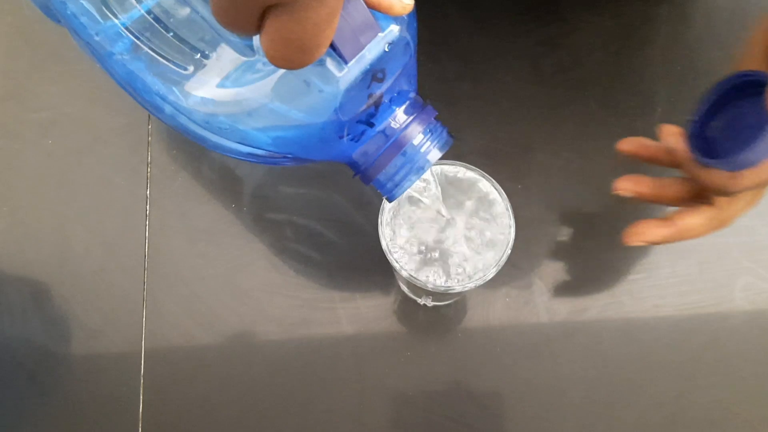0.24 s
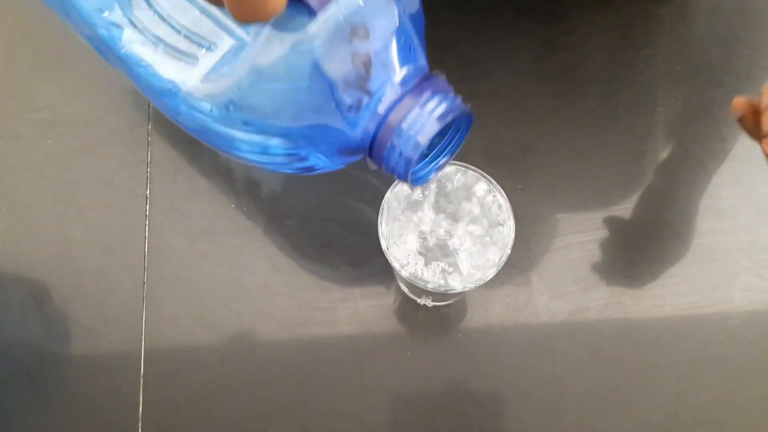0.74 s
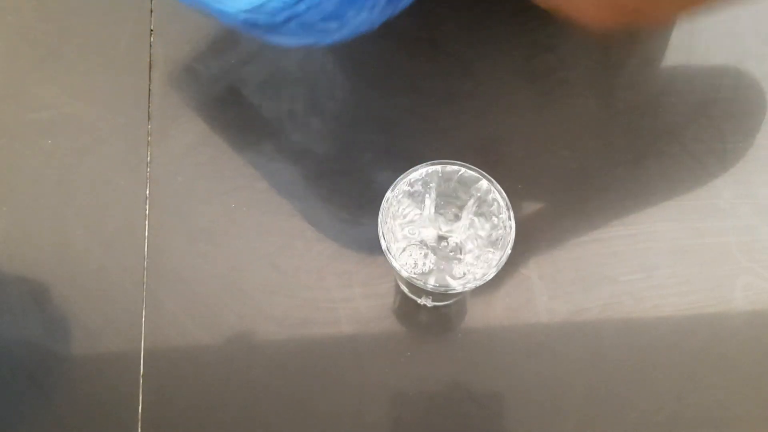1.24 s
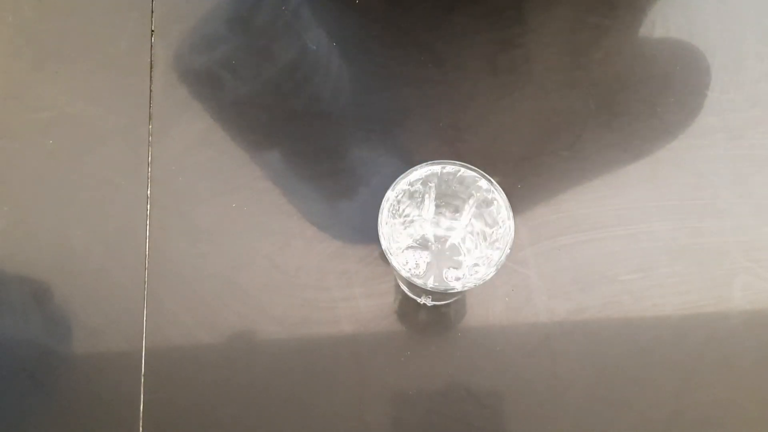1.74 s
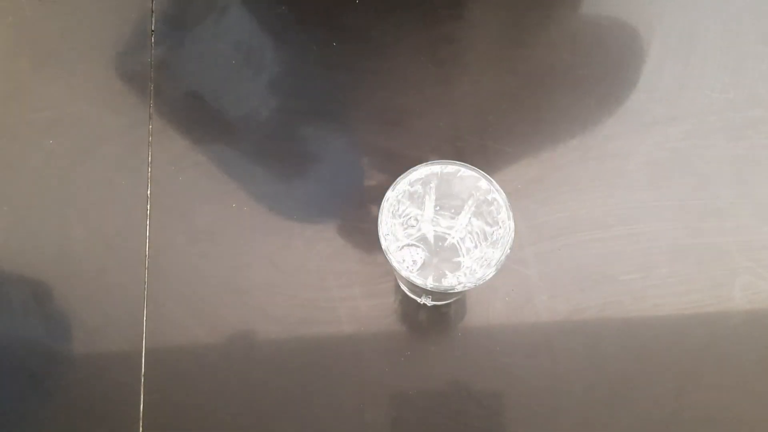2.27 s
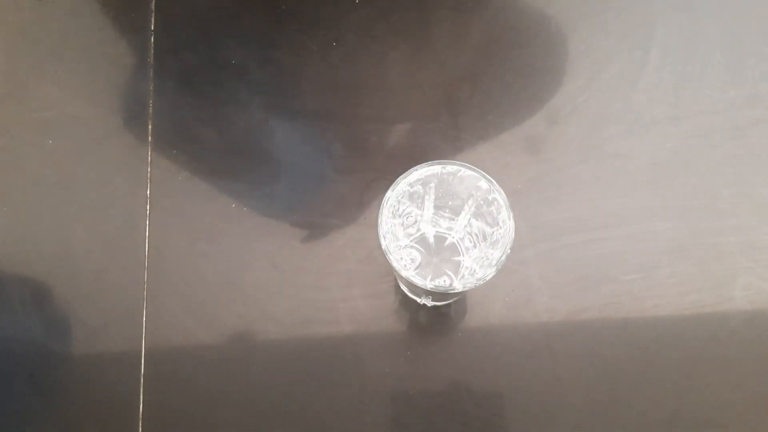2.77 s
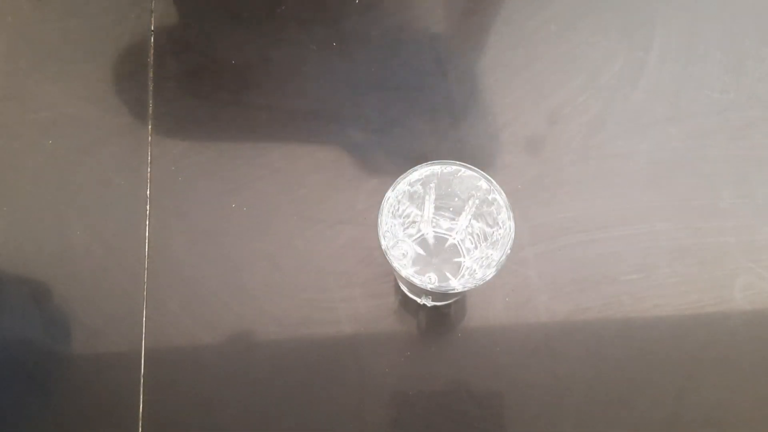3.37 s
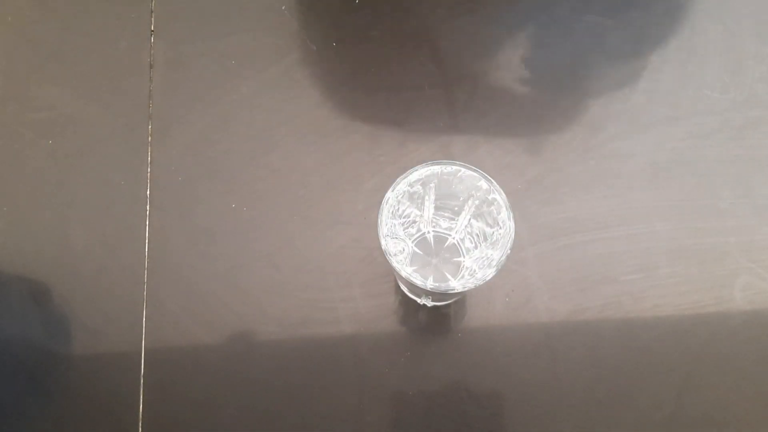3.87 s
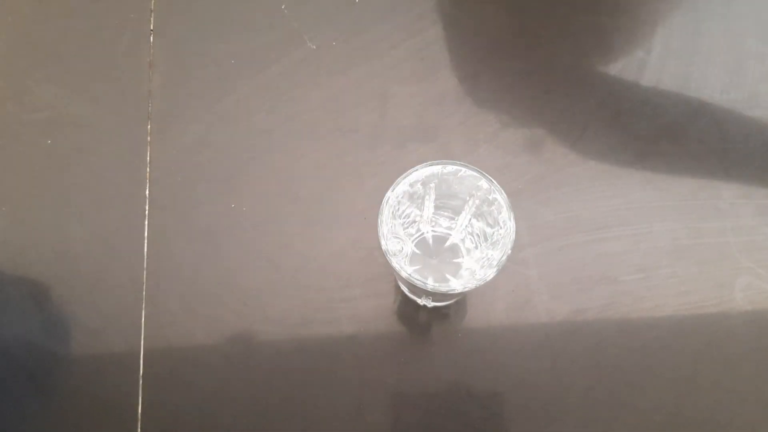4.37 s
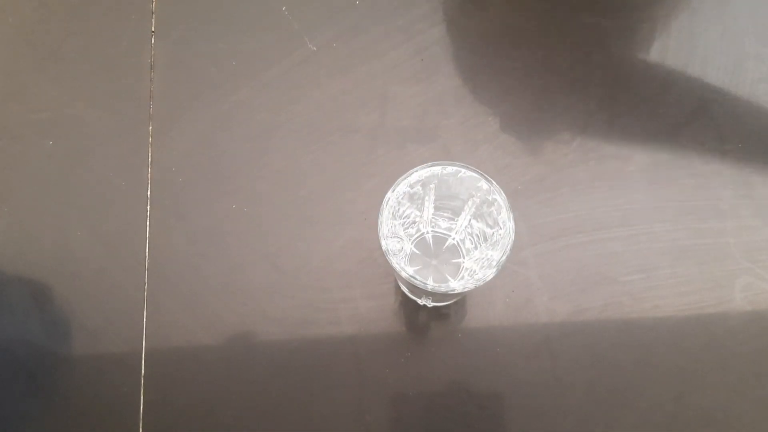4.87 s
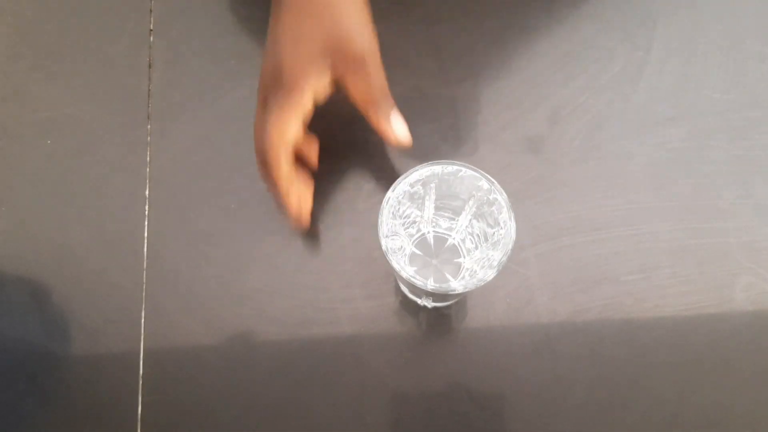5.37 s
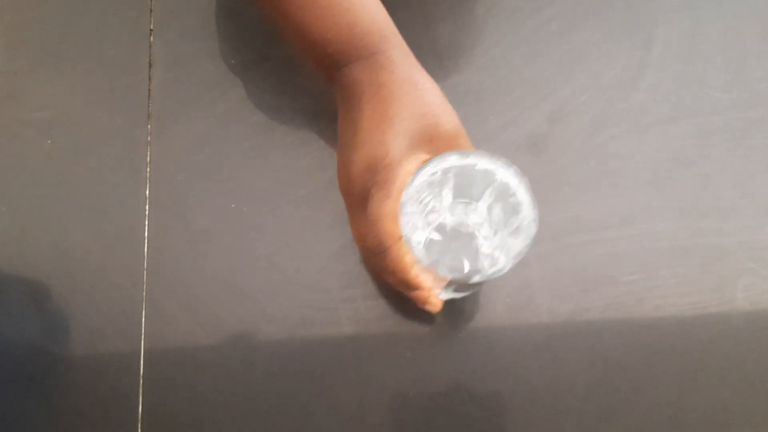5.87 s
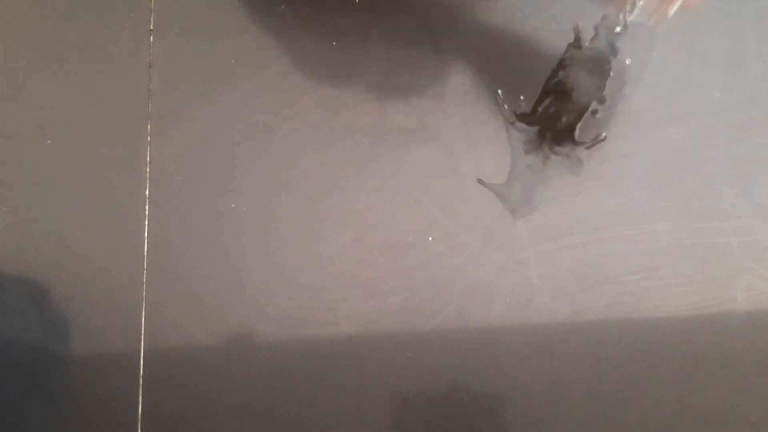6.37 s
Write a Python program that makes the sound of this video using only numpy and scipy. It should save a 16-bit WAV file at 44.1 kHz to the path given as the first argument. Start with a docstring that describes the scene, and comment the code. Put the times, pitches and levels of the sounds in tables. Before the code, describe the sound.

In a hard, echoing room, the end of a pour glugs softly into a tumbler and settles into tiny bubbling. A large thin-walled plastic bottle is lifted away, crackling and popping in irregular bursts, then set down with two loud, boomy thumps close together. A few small crinkles follow, then a hand slides the glass off the table with a low judder. Faint room air and a steady hum lie beneath; stereo pickup.

```python
"""The last of a pour gurgles from a big plastic water bottle into a tumbler in a hard, echoing room.
The bottle is lifted away, its thin walls buckling and crackling, and is set down with two heavy thumps.
A hand then slides the glass off the table, over a faint steady hum. Filtered noise renders flow and friction,
decaying sinusoids the resonances, and click clusters the impacts, each answered by a decaying room tail."""
import sys
import numpy as np
from scipy import signal
from scipy.fft import rfft, irfft
from scipy.io import wavfile

SR = 44100
rng = np.random.default_rng(int(sys.argv[2]) if len(sys.argv) > 2 else 0)


def unload_wav(signal):
    """Save mono or channel-first audio to the path in sys.argv[1] as 16-bit WAV at rate SR, clipped to [-1, 1]."""
    wavfile.write(
        sys.argv[1],
        SR,
        np.round(np.clip(np.atleast_2d(signal).T, -1, 1) * 32767).astype(np.int16),
    )


N = 291930
TIME = np.arange(N) / SR
T = TIME[:SR]  # one second, the life of a single sound

# quiet room air, noise spectrum: f/Hz, level/dB per Hz
AIR_SPECTRUM = [(40, -28.5), (110, -12), (220, -25), (320, -7), (450, -17.5), (570, -28), (2900, -34.5),
                (7900, -35), (9300, -38.5), (15800, -42)]
AIR_DB, HUM_HZ, HUM_DB = -71.5, 434, -72
# reverberation of the room: f/Hz, t60/s
ROOM_DECAY = [(80, 0.59), (300, 0.58), (2500, 0.54), (6000, 0.39), (14000, 0.75)]
# left-right correlation of diffuse sound: f/Hz, correlation (1 = identical)
STEREO_LIKENESS = [(35, 0.29), (100, 1), (250, 0.29), (500, 1), (1000, 0)]
EDGE_HZ = 15900  # upper limit of the recorded band

# stream into the glass until about 0.75 s, then water settling in it: t/s, gurgle level/dB, trickle level/dB
WATER_LEVELS = [(0, -57.5, -69.5), (0.45, -60.5, -83.5), (0.8, -63.5, -74), (1.1, -63, -64.5),
                (1.4, -58.5, -70)]
# resonances of the air above the water in the glass: f/Hz, width/Hz, level/dB
GLASS_AIR_MODES = [(1220, 23, 6.5), (1610, 140, 4.5), (2400, 190, 1), (3800, 340, -8)]
SPRAY_DB = -17.5  # fine spray, relative to the gurgle
BUBBLES_PER_S, BUBBLE_LOW_HZ, BUBBLE_HIGH_HZ = 97, 1103, 4445  # small bubbles in the glass
BUBBLE_CYCLES, BUBBLE_RISE_PER_S = 40, 1.3  # cycles to fall to 1/e, fractional upward glide
BUBBLES_DB = -2  # relative to the trickle

# glugs of air in the bottle neck: t/s, level/dB before GLUG_TRIM_DB
GLUG_EVENTS = [(0.001, -33), (0.045, -32), (0.122, -37), (0.248, -38.5), (0.513, -40)]
# droplets, tiny bursting bubbles, and last a tick of the glass rim: t/s, level/dB before TICK_TRIM_DB, f/Hz
DROPLET_AND_RIM_TICKS = [(0.541, -56, 7400), (0.623, -54.5, 7100), (0.676, -57, 5330), (0.893, -54, 6360),
                         (0.9294, -51, 7600), (1.142, -44.5, 13200), (5.985, -64, 3810)]
GLUG_TRIM_DB, TICK_TRIM_DB = -13, -15
# hollow notes and squeaks of the tilting bottle, bubbles in its water: t/s, level/dB, f/Hz, swell/s, t60/s
BOTTLE_NOTES = [(0.532, -48, 97.7, 0.0063, 0.49), (1.072, -41, 754, 0.018, 0.17),
                (1.136, -47, 104, 0.019, 0.38), (1.369, -38, 97, 0.033, 0.49),
                (1.541, -34, 116.7, 0.12, 0.13), (3.996, -47.5, 3340, 0.0045, 0.044),
                (4.039, -49.5, 1513, 0.018, 0.11), (4.959, -39.5, 126.5, 0.071, 0.15)]
# soft swishes of water and of the moving arm: t/s, level/dB, centre f/Hz, half-width/Hz, rise/s, t60/s
SWISH_EVENTS = [(0.139, -64.5, 3740, 500, 0.094, 0.5), (5.489, -64.5, 3035, 2440, 0.079, 0.41)]

# hands shifting their grip on the bottle: peak t/s, effort level/dB, swell/s
GRIP_EVENTS = [(1.15, -5.5, 0.096), (1.344, 3, 0.018), (1.508, -1, 0.039), (2.3, 0, 0.12),
               (2.55, -3.5, 0.035), (3.07, 0, 0.36), (3.517, 11.5, 0.038), (3.7, 2, 0.067),
               (4.054, -0.5, 0.18), (4.352, 4, 0.099), (5.04, -3.5, 0.7)]
GRIP_RELEASE_S = 0.07  # time for a grip's effort to fall to 1/e
# light effort all the while the bottle is held
CARRY_S, CARRY_END_S, CARRY_DB, CARRY_FADE_S = 1, 5.24, -18.5, 0.073
RUB_DB, RUSTLE_DB, RUSTLE_POWER = -58.5, -57, 0.76  # at 0 dB effort; the rustle grows more slowly
# buckles of the wall: t/s, then level/dB of knock, crack, fine tick and boom of the air inside
BUCKLE_EVENTS = [(1.347, -34.5, -30, -56, -43.5), (1.482, -40, -47.5, -60, -41),
                 (1.510, -35.5, -43.5, -68, -37), (1.651, -36, -35, -37, -36.5),
                 (1.663, -46, -68, -70, -60), (1.787, -43.5, -48, -49, -45.5), (2.122, -40, -52, -52, -43),
                 (2.135, -45, -45.5, -55, -46), (2.206, -49, -56, -72, -44),
                 (2.238, -47.5, -54.5, -74, -50), (2.311, -42, -47.5, -57, -38.5),
                 (2.329, -46, -44, -44, -44.5), (2.992, -44.5, -48.5, -64.5, -57.5),
                 (3.036, -34.5, -42.5, -47, -42), (3.052, -35.5, -37.5, -46, -43.5),
                 (3.074, -25.5, -29.5, -34, -60), (3.115, -38, -50, -64, -36.5),
                 (3.151, -38.5, -41, -62, -44.5), (3.350, -49.5, -40.5, -41.5, -45.5),
                 (3.362, -33, -33.5, -49, -37), (3.667, -60, -64, -68, -37), (3.698, -46, -63, -70, -44.5),
                 (3.732, -49.5, -52.5, -41, -44), (3.762, -44.5, -51.5, -70, -48),
                 (3.863, -47.5, -61, -66, -54.5), (3.884, -47, -62, -71.5, -51.5),
                 (3.899, -51, -63, -71, -51.5), (3.971, -44.5, -56.5, -50.5, -45.5),
                 (3.998, -47, -67, -61, -42), (4.304, -57.5, -47, -52.5, -48.5),
                 (4.316, -57.5, -63, -68, -37.5), (4.901, -65, -54, -44, -41.5),
                 (5.181, -62, -56, -49.5, -52)]
# resonances colouring the bottle's sounds, probably of room, table or microphone: f/Hz, width/Hz, lift/dB
COLOURING_MODES = [(768.7, 17, 8), (1185, 70, 1.5), (1492, 35, -3)]
# air inside the bottle, noise spectrum: f/Hz, level/dB per Hz
BOOM_SPECTRUM = [(60, -12.5), (110, -1), (150, -3.5), (200, -16), (300, 1.5), (380, -9), (480, -15),
                 (800, -38)]
# knocked or rubbed bottle wall, also the scraping glass, noise spectrum: f/Hz, level/dB per Hz
WALL_SPECTRUM = [(450, -15), (660, 0), (790, 1.5), (1000, 2.5), (1300, -4.5), (1800, -11.5), (3000, -43.5)]
# cracking wall, noise spectrum: f/Hz, level/dB per Hz
CRACK_SPECTRUM = [(850, -23.5), (1250, 0), (2300, 1), (3400, -8), (4800, -19.5), (8000, -33)]
# fine ticks of the wall, noise spectrum: f/Hz, level/dB per Hz
TICK_SPECTRUM = [(4500, 6.5), (6000, 2), (8300, -6), (9500, -13), (12000, -11), (15500, -14)]
# rustling wall, also the water's spray, noise spectrum: f/Hz, level/dB per Hz
RUSTLE_SPECTRUM = [(2000, 2.5), (3500, -2.5), (8200, -6.5), (9500, -14.5), (12500, -8.5), (15800, -15.5)]

# landings of the bottle: t/s, push level/dB, push f/Hz, rise/s, ring level/dB
LANDING_EVENTS = [(4.454, -12, 140.9, 0.015, -19), (4.647, -6.5, 124.8, 0.0065, -15.5)]
# sharp snaps of the landing, partly overload crackle: t/s, level/dB, left delay/s, treble tilt/dB per octave
SNAP_EVENTS = [(4.451, -38, 0.0058, 2), (4.475, -20, 0.0034, 1.5), (4.644, -23, 0, 0)]
# modes of the bottle and the surface it lands on: f/Hz, level/dB, t60/s
SURFACE_MODES = [(160, -5, 0.2), (232, -12.5, .45), (290, -8.5, 0.48), (312, -8.5, 0.57),
                 (356.5, -11.5, 0.56), (507, -17, 0.38), (761, -16.5, 0.44), (836, -24.5, 0.42),
                 (994, -25.5, 0.32)]
BASE_DB, BASE_T60 = -3.5, 0.49  # the base itself rings on at the pitch of its push
# boom of the landing, noise spectrum: f/Hz, level/dB per Hz
THUMP_SPECTRUM = [(85, -3.5), (150, -0.5), (199, -15.5), (270, -5), (405, -8), (600, -26), (690, -28),
                  (758, -14.5), (900, -27.5), (1060, -19), (1300, -44.5)]
# sharp snap of the landing, noise spectrum before its tilt: f/Hz, level/dB per Hz
SNAP_SPECTRUM = [(900, -2), (2200, 3.5), (3300, -1.5), (6000, -9), (8300, -15.5), (9600, -27.5),
                 (12000, -22), (15800, -33.5)]

# glass on the table, also glugs and gurgle, noise spectrum: f/Hz, level/dB per Hz
HOLLOW_SPECTRUM = [(80, -18), (230, -16.5), (300, -6), (370, -14.5), (470, -22.5), (600, -38.5),
                   (900, -32.5)]
# jolts of the sliding glass: t/s, level/dB
JOLT_EVENTS = [(5.798, -39.5), (5.855, -46.5), (5.895, -47), (5.985, -48)]
TABLE_HZ, TABLE_T60 = 304, 0.16  # the hollow note of each jolt
SLIDE_S, SLIDE_RISE_S, LIFT_S, LIFT_T60 = 5.768, 0.033, 5.99, 0.27  # the glass slides, then leaves the table
JUDDER_DB, JUDDER_DB_PER_S = -49, -20.5  # level at the start of the slide, and its change
SCRAPE_DB, SCRAPE_DB_PER_S = -67.5, 37
SCRAPE_SQUEAK = [(760, 33, 0.5)]  # the scrape gathers round one note: f/Hz, width/Hz, level/dB


def amp(db):
    """Logarithmic level: 20 dB is a factor of ten in amplitude."""
    return 10 ** (np.asarray(db) / 20)


def unit(x):
    """Power normalization to rms 1."""
    return x / np.sqrt(np.mean(x ** 2) + 1e-30)


def read(points, hz):
    """Linear interpolation of a table on a logarithmic frequency axis."""
    f, value = np.transpose(points)
    return np.interp(np.log(hz + 1), np.log(f + 1), value)


def add(mix, s, sound):
    """Superposition: a sound joins the mix from time s."""
    part = mix[:, max(round(s * SR), 0):][:, :sound.shape[-1]]
    part += sound[..., :part.shape[1]]


def decay(t, t60):
    """Exponential damping: 60 dB lost in t60 seconds."""
    return np.exp(-np.log(1000) * t / t60)


def fade(rise_s, t60):
    """Transient envelope: a smooth rise, then exponential damping."""
    rise_s = max(rise_s, 1 / SR)
    rise = np.sin(np.pi / 2 * np.minimum(T / rise_s, 1)) ** 2
    return rise * decay(np.maximum(T - rise_s, 0), t60)


def wander(rate_hz):
    """Low-pass random process: slow motion of rms 1."""
    low = np.fft.rfftfreq(N, 1 / SR) < rate_hz
    return unit(irfft(rfft(rng.standard_normal(N)) * low, N))


def level(curve, column):
    """Amplitude envelope: gain over time from one dB column, silent outside the table."""
    rows = np.array(curve)
    return amp(np.interp(TIME, rows[:, 0], rows[:, column], left=-200, right=-200))


def resonances(hz, modes):
    """Modal superposition: the complex response of damped resonators."""
    return sum(amp(db) / (1 + 2j * (hz - f) / width) for f, width, db in modes)


def colour(x, spectrum, size=4096):
    """Minimum-phase filtering: a causal response whose phase follows from its log gain."""
    hz = np.abs(np.fft.fftfreq(size, 1 / SR)) + 1
    octaves_outside = np.abs(np.log2(hz / np.clip(hz, spectrum[0][0], spectrum[-1][0])))
    gain_db = np.maximum(read(spectrum, hz) - 24 * octaves_outside, -100)
    log_response = np.conj(signal.hilbert(np.log(amp(gain_db))))
    taps = np.fft.ifft(np.exp(log_response)).real[:size // 2]
    return signal.fftconvolve(np.atleast_2d(x), taps[None], axes=1)[:, :x.shape[-1]]


def diffuse(size):
    """Diffuse field: noise whose correlation between the two microphones depends on frequency."""
    same = np.clip(read(STEREO_LIKENESS, np.fft.rfftfreq(size, 1 / SR)), -1, 1)
    mid, side = np.exp(2j * np.pi * rng.random((2, size // 2 + 1)))
    mid, side = mid * np.sqrt(1 + same), side * np.sqrt(1 - same)
    return unit(irfft([mid + side, mid - side], size))


def room_tail(build_s=0.0013):
    """Reverberation: a diffuse echo tail of energy 1, each band dying at its own rate."""
    hz, t, z = signal.stft(diffuse(SR), SR, nperseg=256)
    damped = z * decay(t, read(ROOM_DECAY, hz)[:, None])
    tail = signal.istft(damped, SR, nperseg=256)[1][:, :SR]
    tail *= 1 - np.exp(-T / build_s)
    return tail / np.linalg.norm(tail[0])


def blow(spectrum, length_s, tail, room_db, lag_s):
    """Impact excitation: a click and its dying cluster, filtered, plus the room. Direct gain 1 over 10 ms."""
    clicks = unit(rng.standard_normal(SR) ** 3) * np.exp(-T / length_s) * fade(0.002, t60=1)
    clicks[0] += 0.2 * np.linalg.norm(clicks)
    direct = colour(clicks[:SR // 4], spectrum)[0]
    direct = np.pad(direct / np.linalg.norm(direct), (0, SR - len(direct)))
    # the far microphone hears it later: the left one for a positive lag
    pair = np.array([np.roll(direct, max(round(side * lag_s * SR), 0)) for side in (1, -1)])
    echo = colour(tail, spectrum)
    echo *= np.sqrt(2) / np.linalg.norm(echo)
    return np.sqrt(SR / 100) * (pair + amp(room_db) * echo)


def background():
    """Steady sources: noise of the room air, and a faint tone slightly wavering in phase."""
    hum = np.sqrt(2) * np.sin(2 * np.pi * HUM_HZ * TIME + 0.5 * wander(rate_hz=5.5))
    return amp(AIR_DB) * unit(colour(diffuse(N), AIR_SPECTRUM)) + amp(HUM_DB) * hum


def water_in_glass():
    """Turbulent excitation: noise gurgles, sprays and patters in the glass's air as water pours, then settles."""
    hz = np.fft.rfftfreq(N, 1 / SR)
    cavity = resonances(hz, GLASS_AIR_MODES) / (1 + (hz / GLASS_AIR_MODES[-1][0]) ** 4)
    patter = amp(5 * wander(rate_hz=250))
    trickle = unit(irfft(rfft(diffuse(N) * patter) * cavity, N))
    gurgle = unit(colour(diffuse(N), HOLLOW_SPECTRUM)) * unit(amp(2 * wander(rate_hz=24)))
    spray = amp(SPRAY_DB) * unit(colour(diffuse(N) * patter, RUSTLE_SPECTRUM))
    return (gurgle + spray) * level(WATER_LEVELS, column=1) + trickle * level(WATER_LEVELS, column=2)


def bubbles(count=28):
    """Bubble resonance: bubbles of many sizes ping in the glass, glide up a little and echo in the room."""
    t, pings = T[:SR // 12], np.zeros(N)
    for hz in np.geomspace(BUBBLE_LOW_HZ, BUBBLE_HIGH_HZ, count):
        gliding = np.sin(2 * np.pi * hz * t * (1 + BUBBLE_RISE_PER_S * t / 2))
        ping = gliding * np.exp(-hz * t / BUBBLE_CYCLES) * (1 - np.exp(-hz * t / 2))
        births = (rng.random(N) < BUBBLES_PER_S / count / SR) * rng.random(N) ** 2
        pings += signal.oaconvolve(births, ping)[:N]
    wet = signal.fftconvolve(pings[None], room_tail(), axes=1)[:, :N]
    return amp(BUBBLES_DB) * unit(pings + wet) * level(WATER_LEVELS, column=2)


def glugs_ticks_and_notes():
    """Short transients: air gulps through the neck, droplets and the glass rim tick, the bottle sounds notes."""
    out = np.zeros((2, N))
    for s, db in GLUG_EVENTS:
        glug = blow(HOLLOW_SPECTRUM, length_s=0.013, tail=room_tail(), room_db=2.5, lag_s=0)
        add(out, s, amp(db + GLUG_TRIM_DB) * glug)
    for s, db, hz in DROPLET_AND_RIM_TICKS:
        band = [(hz / 2, -20), (hz / np.sqrt(2), -10), (hz, 0), (hz * np.sqrt(2), -20)]
        tick = blow(band, length_s=0.011, tail=room_tail(), room_db=1.5, lag_s=0)
        add(out, s, amp(db + TICK_TRIM_DB) * tick)
    for s, db, hz, swell, t60 in BOTTLE_NOTES:
        add(out, s, amp(db) * np.sin(2 * np.pi * hz * T) * fade(swell, t60))
    return out


def swishes():
    """Band-limited noise: soft hisses that swell and die."""
    out = np.zeros((2, N))
    hz = np.fft.rfftfreq(SR, 1 / SR)
    for s, db, centre, width, rise, t60 in SWISH_EVENTS:
        band = 1 / (1 + ((hz - centre) / width) ** 2)
        band *= hz ** 2 / (hz ** 2 + centre ** 2)  # less bass
        hiss = unit(irfft(rfft(diffuse(SR)) * band, SR))
        add(out, s, amp(db) * hiss * fade(rise, t60))
    return out


def effort():
    """Addition of powers: a light steady hold, and a swell and release for each new grip of the hands."""
    outside = np.abs(TIME - np.clip(TIME, CARRY_S, CARRY_END_S))
    power = (amp(CARRY_DB) * np.exp(-outside / CARRY_FADE_S)) ** 2
    for s, db, swell_s in GRIP_EVENTS:
        distance = np.maximum((s - TIME) / swell_s, (TIME - s) / GRIP_RELEASE_S)
        power = power + (amp(db) * np.exp(-distance)) ** 2
    return np.sqrt(power)


def handling(slosh_db=-5, crinkle_db=-6):
    """Granular friction: fingers rub the wall in small grainy slips while water rocks in the bottle."""
    slosh = unit(colour(diffuse(N), BOOM_SPECTRUM))
    grain = unit(amp(3.2 * wander(rate_hz=900) + 1.3 * wander(rate_hz=35)))
    rub = unit(colour(diffuse(N) * grain, WALL_SPECTRUM))
    crinkle = unit(colour(diffuse(N) * grain, CRACK_SPECTRUM))
    rustle = unit(colour(diffuse(N) * np.sqrt(grain), RUSTLE_SPECTRUM))
    work = effort()
    rubbing = rub + amp(crinkle_db) * crinkle + amp(slosh_db) * slosh
    return amp(RUB_DB) * work * rubbing + amp(RUSTLE_DB) * work ** RUSTLE_POWER * rustle


def dented(spectrum, count=48):
    """Changed modes: each new dent in the plastic gives the spectrum chance peaks and dips."""
    hz = np.geomspace(spectrum[0][0], spectrum[-1][0], count)
    depth_db = 2.2
    return list(zip(hz, read(spectrum, hz) + depth_db * rng.standard_normal(count)))


def buckles(firm_db=-40):
    """Snap-through buckling: each event knocks the wall, cracks, ticks and pumps the air inside."""
    out = np.zeros((2, N))
    lag_s = -0.00008  # the right microphone hears it later
    for s, knock_db, crack_db, tick_db, boom_db in BUCKLE_EVENTS:
        tail = room_tail()
        force_db = min(knock_db - firm_db, 1)  # gentle buckles are duller and shorter
        wall = [(hz, db + force_db * max(np.log2(hz / 850), 0)) for hz, db in WALL_SPECTRUM]
        knock = blow(wall, length_s=0.01 * amp(force_db), tail=tail, room_db=-3, lag_s=lag_s)
        boom = blow(BOOM_SPECTRUM, length_s=0.046, tail=tail, room_db=5, lag_s=0)
        crack = blow(dented(CRACK_SPECTRUM), length_s=0.0082, tail=tail, room_db=-3, lag_s=lag_s)
        tick = blow(dented(TICK_SPECTRUM), length_s=0.018, tail=tail, room_db=-6, lag_s=lag_s)
        add(out, s, amp(knock_db) * knock + amp(boom_db) * boom)
        add(out, s, amp(crack_db) * crack + amp(tick_db) * tick)
    return out * amp([[0.8], [-0.8]])  # dB, a little louder on the left


def colouring(x):
    """Linear filtering: resonances, probably of room, table or microphone, colour the bottle's sounds."""
    hz = np.fft.rfftfreq(2 * N, 1 / SR)
    response = 1 + resonances(hz, COLOURING_MODES)
    return irfft(rfft(x, 2 * N) * response)[:, :N]


def landings(lag_s=0.00036):
    """Impact and free vibration: the bottle drops on one edge, then flat; push, ringing modes, boom, sharp snaps."""
    out = np.zeros((2, N))
    heard = T - np.array([[lag_s], [0]])  # set down to the right
    for s, push_db, push_hz, rise, ring_db in LANDING_EVENTS:
        push = -np.sin(2 * np.pi * push_hz * heard) * fade(rise, t60=0.06)
        modes = [(push_hz, BASE_DB, BASE_T60)] + list(SURFACE_MODES)
        ring = -sum(amp(db) * np.sin(2 * np.pi * hz * heard) * fade(rise, t60) for hz, db, t60 in modes)
        ring /= np.sqrt(np.mean(ring[:, :SR // 10] ** 2))  # rms 1 over the first 0.1 s
        boom = blow(THUMP_SPECTRUM, length_s=0.0074, tail=room_tail(), room_db=9, lag_s=lag_s)
        add(out, s, amp(push_db) * push + amp(ring_db) * (ring + boom))
    for s, db, delay_s, tilt_db in SNAP_EVENTS:
        lowest_hz = SNAP_SPECTRUM[0][0]
        tilted = [(hz, level_db + tilt_db * np.log2(hz / lowest_hz)) for hz, level_db in SNAP_SPECTRUM]
        add(out, s, amp(db) * blow(tilted, length_s=0.0045, tail=room_tail(), room_db=-2, lag_s=delay_s))
    return out


def glass(ragged_db=2.5):
    """Stick-slip friction: the tumbler's judder weakens while the scrape grows; jolts sound the table's note."""
    slips = unit(amp(2 * wander(rate_hz=120) + ragged_db * wander(rate_hz=23)))
    moving_s = np.clip(TIME, SLIDE_S, LIFT_S) - SLIDE_S
    contact = np.minimum(moving_s / SLIDE_RISE_S, 1) * decay(np.maximum(TIME - LIFT_S, 0), LIFT_T60)
    # each spectrum is applied twice, which doubles its dB contrasts
    judder = unit(colour(colour(diffuse(N) * slips, HOLLOW_SPECTRUM), HOLLOW_SPECTRUM))
    rough = colour(colour(diffuse(N) * slips, WALL_SPECTRUM), WALL_SPECTRUM)
    squeak = 1 + resonances(np.fft.rfftfreq(N, 1 / SR), SCRAPE_SQUEAK)
    scrape = unit(irfft(rfft(rough) * squeak, N))
    judder *= amp(JUDDER_DB + JUDDER_DB_PER_S * moving_s)
    scrape *= amp(SCRAPE_DB + SCRAPE_DB_PER_S * moving_s)
    out = contact * (judder + scrape)
    for s, db in JOLT_EVENTS:
        note = np.sin(2 * np.pi * TABLE_HZ * T) * fade(0.0062, TABLE_T60)
        knock = blow(HOLLOW_SPECTRUM, length_s=0.01, tail=room_tail(), room_db=0, lag_s=0)
        add(out, s, amp(db) * (note + amp(-6.5) * knock))
    return out


def scene():
    """Linear superposition of all sources at the two microphones."""
    pour = water_in_glass() + bubbles() + glugs_ticks_and_notes()
    bottle = colouring(handling() + buckles()) + landings()
    return background() + pour + swishes() + bottle + glass()


def record(dry, low_cut_hz=48):
    """Band limitation: the microphones lose the deepest bass; full-scale limit, then the treble limit."""
    thin = signal.sosfilt(signal.butter(2, low_cut_hz, "high", fs=SR, output="sos"), dry)
    taps = signal.firwin(511, EDGE_HZ, window=("kaiser", 9), fs=SR)
    return signal.oaconvolve(np.clip(thin, -1, 1), taps[None], "same")


dry = scene()
out = record(dry)
unload_wav(out)
```